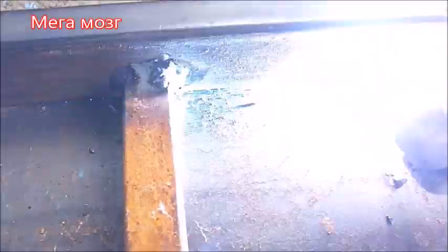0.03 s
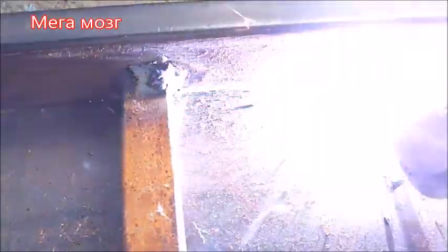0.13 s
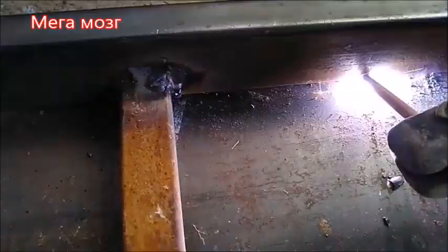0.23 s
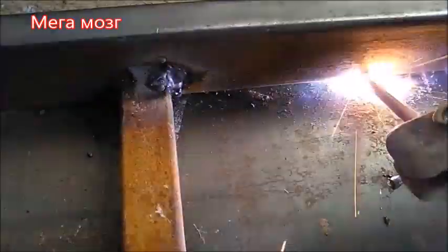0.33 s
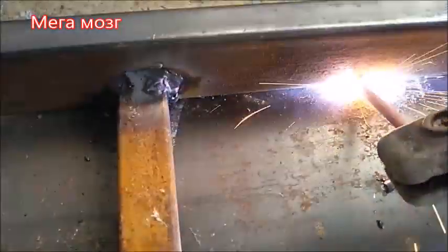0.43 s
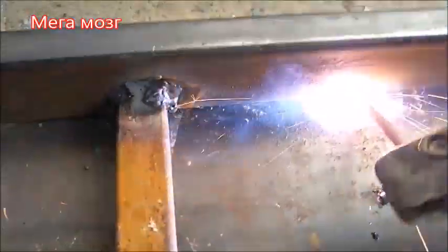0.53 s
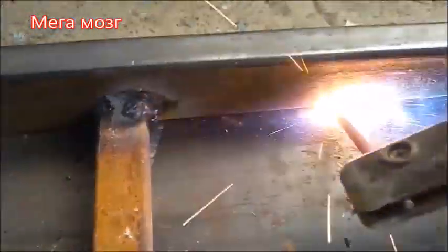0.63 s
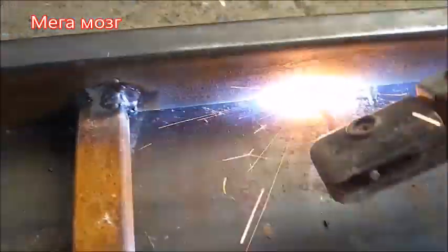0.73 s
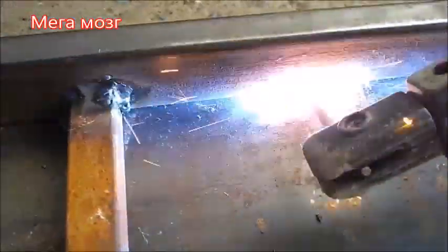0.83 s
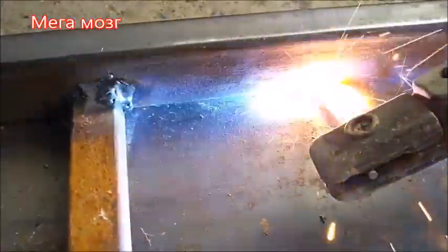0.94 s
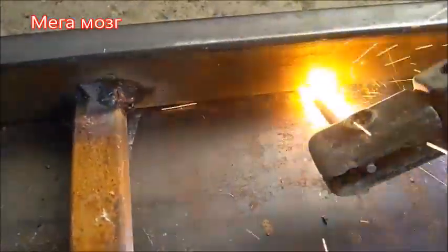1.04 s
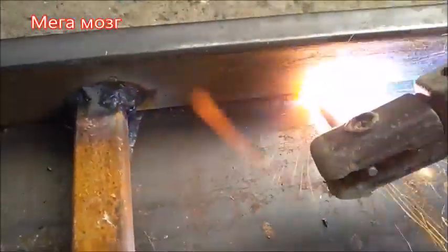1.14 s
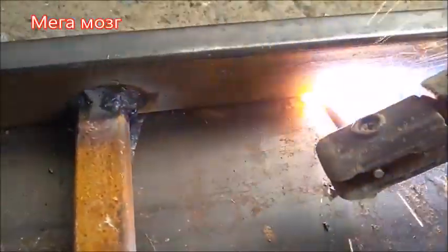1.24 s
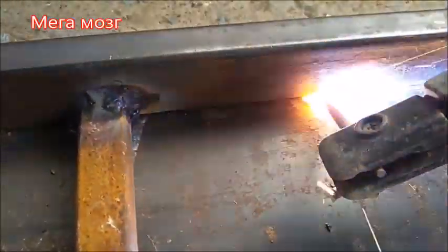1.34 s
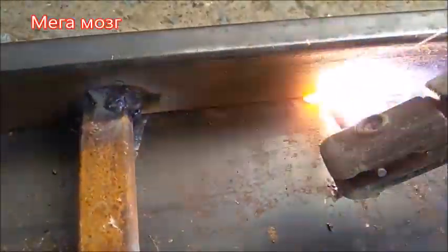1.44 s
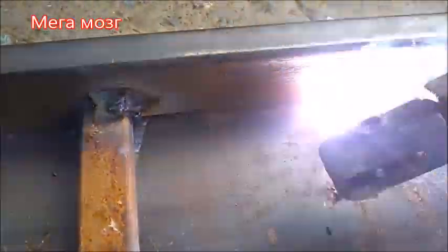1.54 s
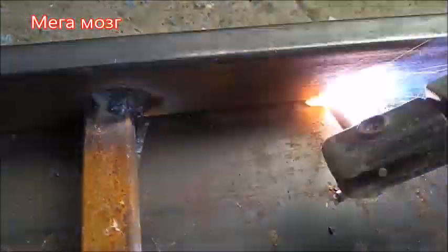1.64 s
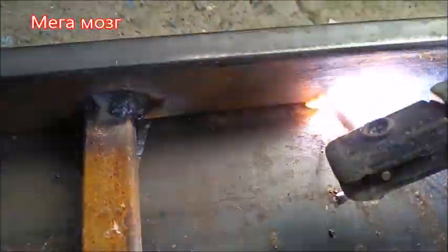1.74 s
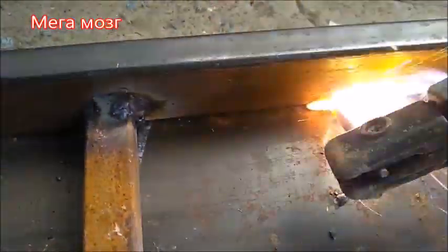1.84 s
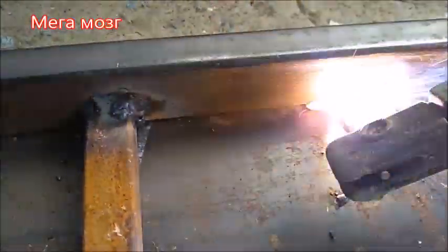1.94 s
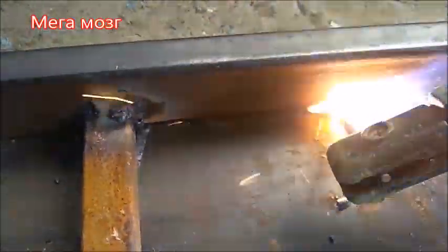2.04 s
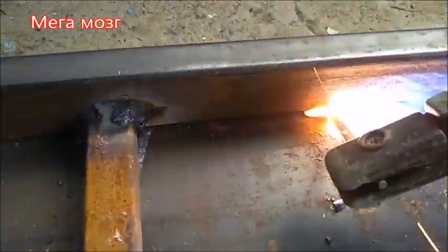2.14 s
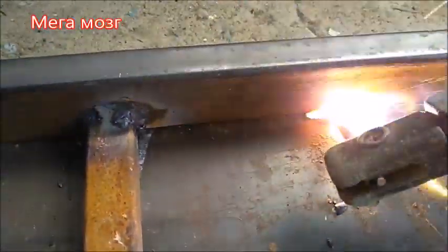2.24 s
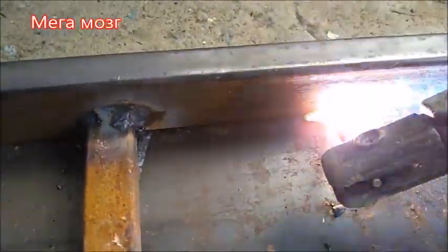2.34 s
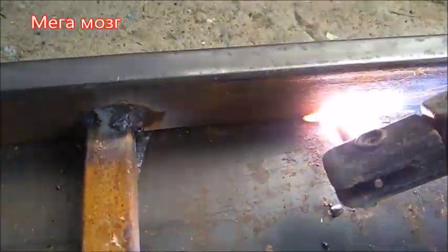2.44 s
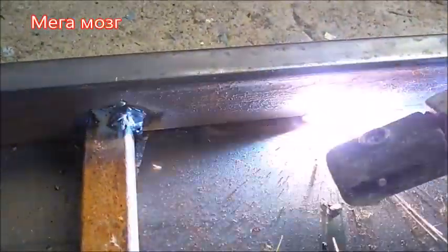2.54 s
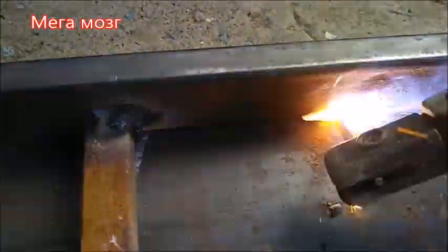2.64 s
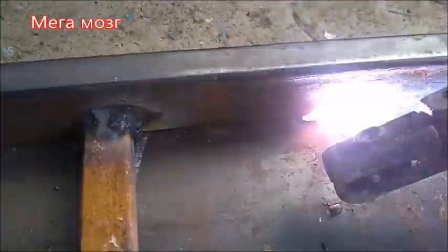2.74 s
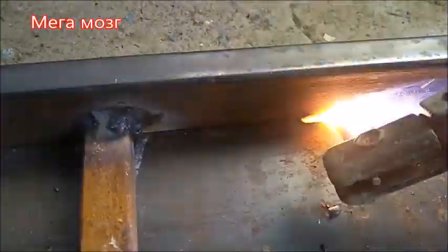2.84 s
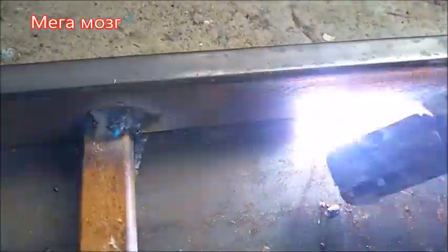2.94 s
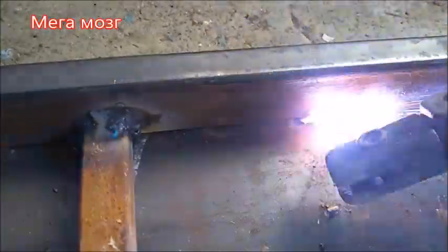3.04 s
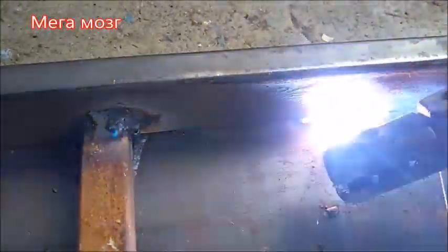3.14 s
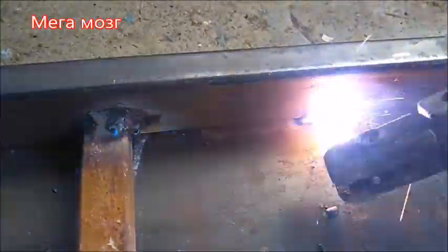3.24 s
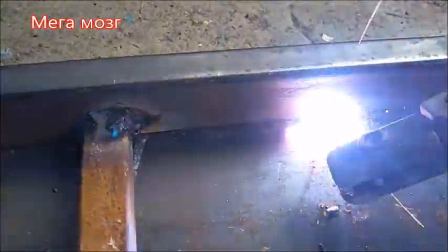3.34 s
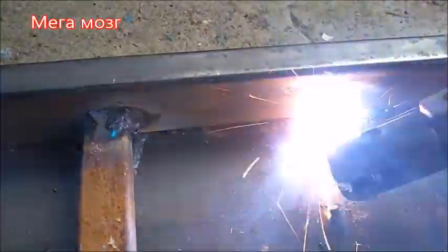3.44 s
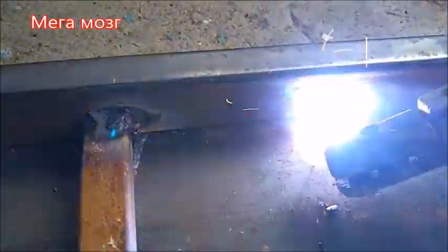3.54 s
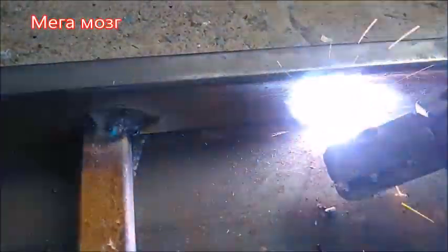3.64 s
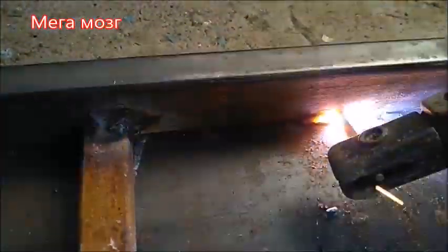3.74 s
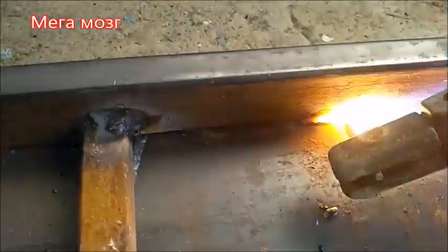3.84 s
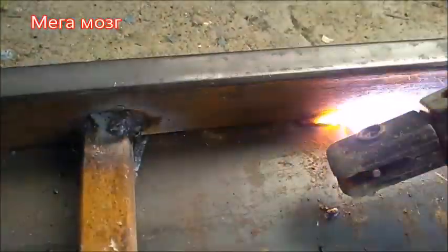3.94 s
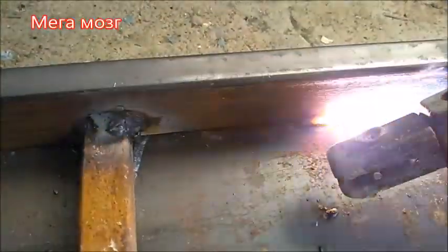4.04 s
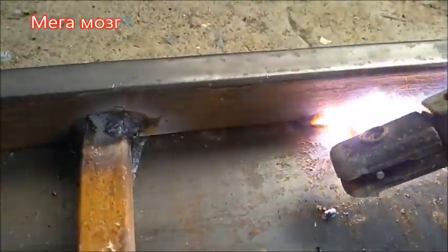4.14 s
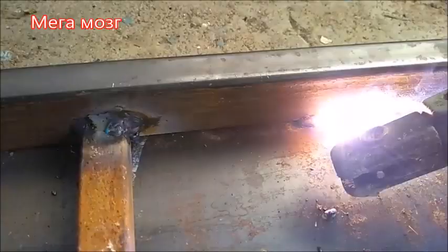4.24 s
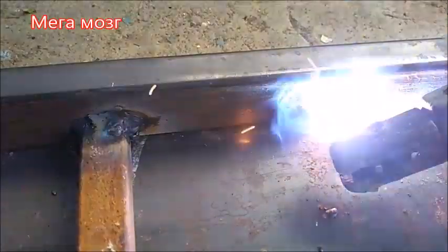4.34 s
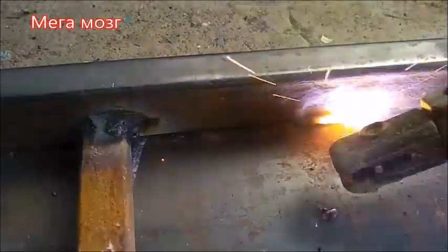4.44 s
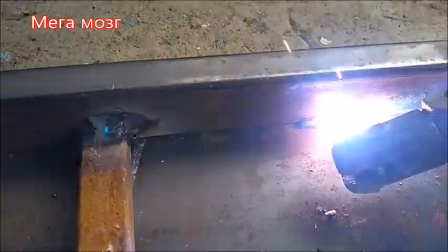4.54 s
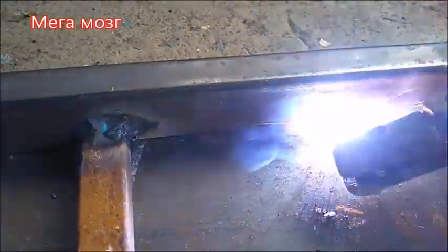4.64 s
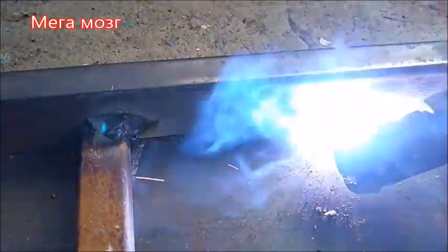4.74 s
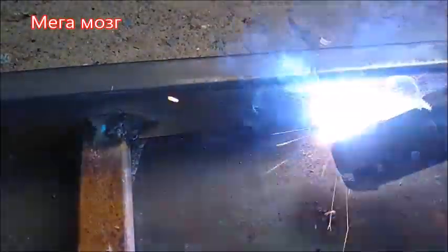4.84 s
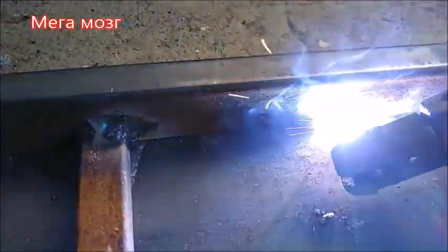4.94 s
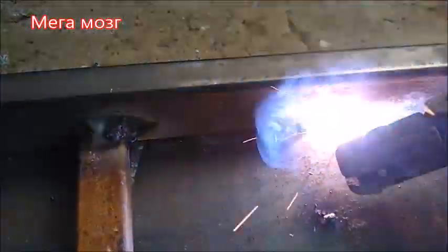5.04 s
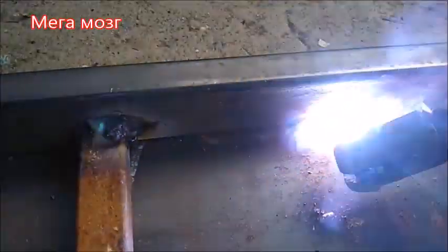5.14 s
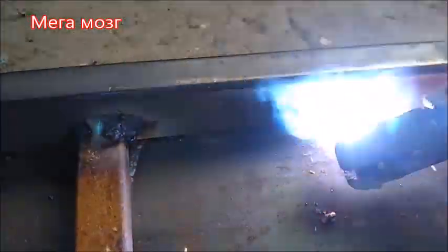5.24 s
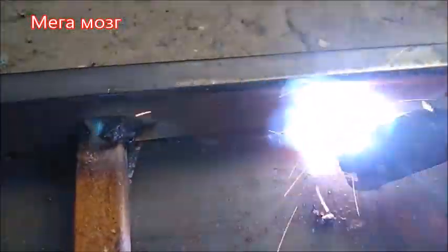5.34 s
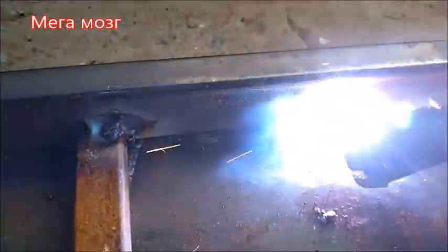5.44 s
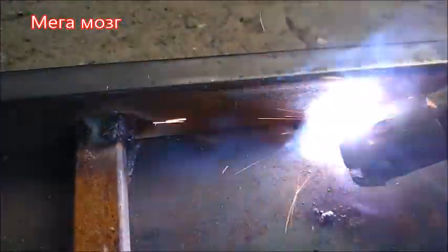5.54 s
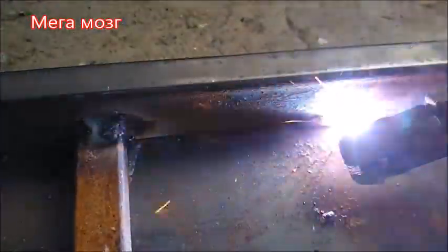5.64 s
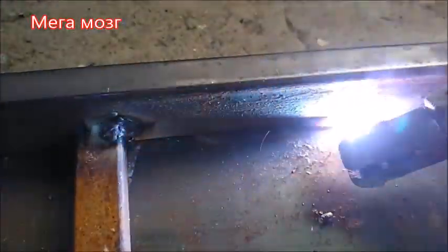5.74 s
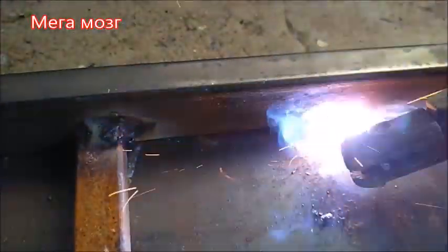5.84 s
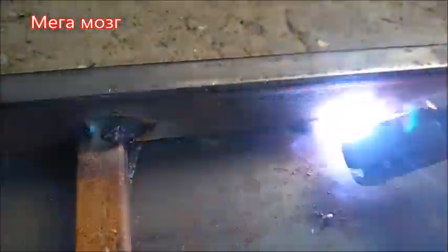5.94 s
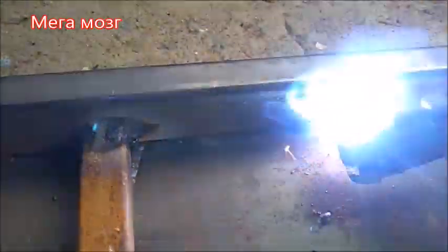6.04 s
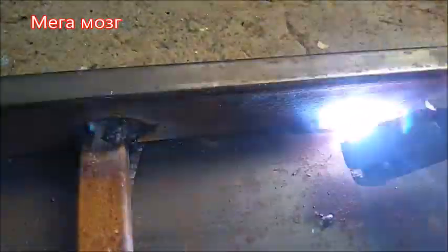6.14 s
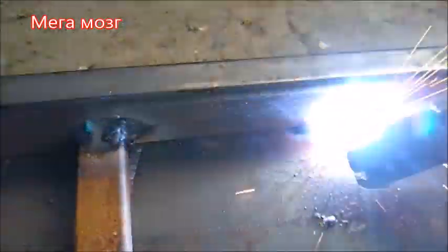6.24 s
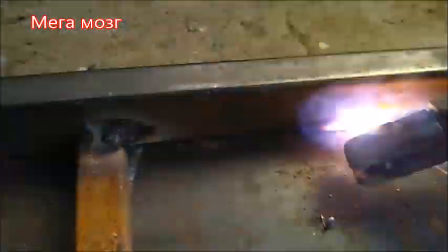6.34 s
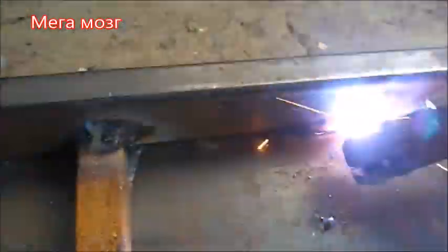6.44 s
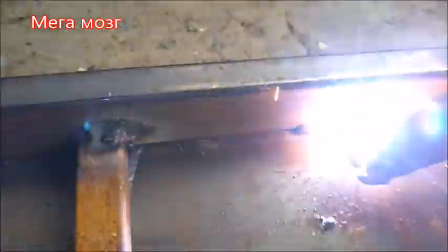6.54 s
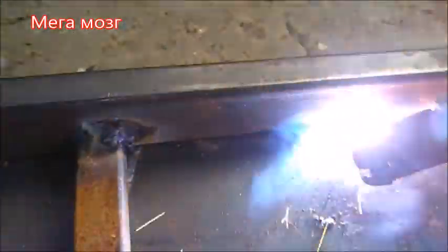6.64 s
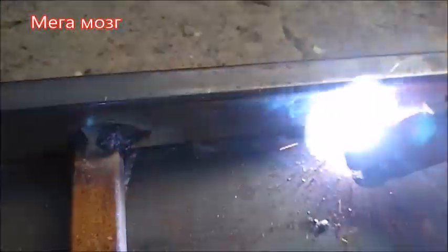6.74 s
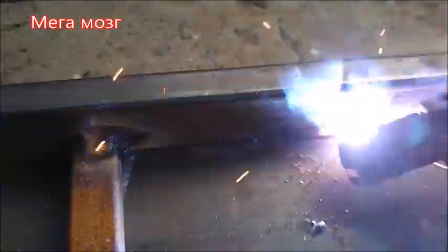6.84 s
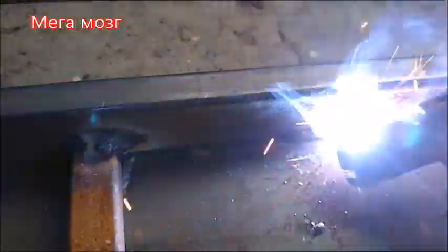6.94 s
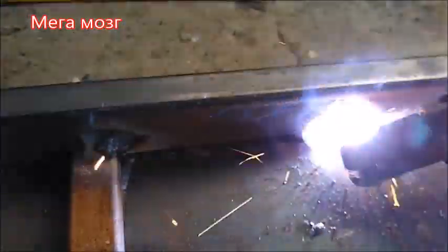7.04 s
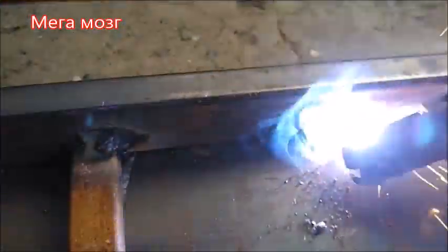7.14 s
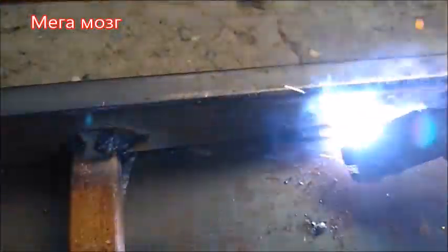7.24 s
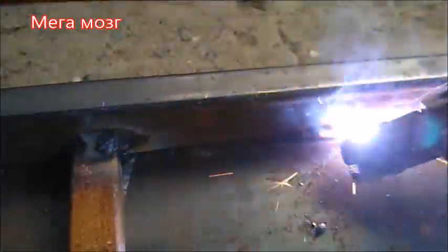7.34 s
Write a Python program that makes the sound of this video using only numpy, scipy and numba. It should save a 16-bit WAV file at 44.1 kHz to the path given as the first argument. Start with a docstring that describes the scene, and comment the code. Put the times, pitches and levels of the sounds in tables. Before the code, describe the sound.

Stick welding heard very near: almost no silence, a faint scratch, then a sudden bright crackling burn. Dense, irregular sputters swell many times a second over continuous hiss, mixed with knocking bursts and bubbly blips. The first two seconds are loudest and centred; later the arc sits to the right, weaker, airy and watery, with occasional strong spits. Dry workshop, compact stereo microphone, slightly hollow, band-limited colour.

```python
"""In the corner of a steel frame, close to a small stereo camera, a rod scrapes: the shop-air noise briefly
rises. A stick-welding arc strikes mid-picture: four ranges of noise burn on and flare about eighteen times a
second. Droplets shorting the gap and bursting gas pockets thud as short swinging tones, and the pool gurgles as
sinking ones. From about two seconds the arc is heard aside: the fainter the hiss, the further right it leans.
All along, dark gaps open and close in the hiss and narrow bands stand out; the gaps deepen once the arc is
aside."""
import sys
import numpy as np
from scipy import signal
from scipy.fft import rfft, irfft
from scipy.io import wavfile
from scipy.ndimage import uniform_filter1d
from numba import njit

SR = 44100
rng = np.random.default_rng(int(sys.argv[2]) if len(sys.argv) > 2 else 0)


def put_to_file(sound):
    """Save the sound as 16-bit audio at rate SR, in the file named by the first command-line argument."""
    columns = np.atleast_2d(sound).T  # one column per channel
    safe = np.clip(columns, -1, 1)
    whole_steps = np.round(safe * 32767)
    wavfile.write(sys.argv[1], SR, whole_steps.astype(np.int16))


N = 326340

# All levels are those ahead of the banded colour and the camera.
STRIKE_S, STRIKE_RISE_S = 0.083, 0.014
ASIDE_S = 1.95  # until then the arc is heard from the middle
POOL_LEAN_DB = -1.5  # left minus right of thuds and gurgles once the arc is aside


def undb(db):
    """Amplitude ratio of a level in dB."""
    return 10 ** (np.asarray(db) / 20)


def colour(x, points):
    """Shapes noise by (f/Hz, level/dB) points and sets its rms to 1."""
    hz, db = np.transpose(points)
    f = np.arange(N // 2 + 1) * SR / N + 1
    shape_db = np.interp(np.log(f), np.log(hz), db, left=-90, right=-90)
    y = irfft(rfft(x) * undb(shape_db), N)
    return y / np.sqrt(np.mean(y ** 2))


def walk(rate):
    """Random levels held 1 / rate s and slewed twice; spread near 1."""
    k = int(SR / rate)
    steps = np.repeat(rng.standard_normal(N // k + 1), k)
    return 1.3 * uniform_filter1d(uniform_filter1d(steps, k), k)[:N]


def sides(pan_db):
    """Left and right gains from left minus right dB."""
    return undb(np.array([pan_db, -pan_db]) / 2)


def pair(points, unlike, grain_db):
    """Grainy noise at two microphones: a shared part and an opposed part."""
    grit = undb(grain_db * rng.exponential(size=N))  # tiny sparks of very uneven size
    mid, side = (colour(grit * rng.standard_normal(N), points) for _ in range(2))
    share = np.clip(unlike, 0, 1) / 2
    return np.sqrt(1 - share) * mid + np.sqrt(share) * side * np.array([[1], [-1]])


SHOP_DB = -60
TOUCH_S, TOUCH_DB = .058, 7  # the rod scrapes the joint from here until the strike; rise of the noise
# Colour of the air in the workshop: f/Hz, relative level/dB per Hz
SHOP_COLOUR = [(60, -40), (150, -8), (500, 0), (900, -6), (1500, -9), (1600, 0), (1700, -10), (2350, -14),
               (2550, 2), (2750, -13), (6000, -17), (16000, -28)]


def shop():
    """Quiet workshop air as steady noise, raised while the rod scrapes."""
    t = np.arange(N) / SR
    scraping = (t > TOUCH_S) * (t < STRIKE_S)
    return undb(SHOP_DB + TOUCH_DB * scraping) * pair(SHOP_COLOUR, 0.058, 0)


GURGLE_SAG, GURGLE_WOBBLE = .3, .5  # share of pitch lost over one length; share it wobbles
GURGLE_ROUGH_DB = 5  # how unevenly a gurgle swings
GURGLE_PAN_DB = 2.5  # furthest spread to either side once the arc is aside
# Bubbles in the molten pool: start t/s, peak level/dB before roughness, f/Hz at the peak, length/ms
GURGLES = [(0.227, -15, 447, 11), (0.267, -24, 420, 12), (0.305, -17, 346, 9.3), (0.343, -24, 462, 11),
           (0.424, -23, 210, 12), (0.513, -22, 259, 13.3), (0.575, -30, 180, 10), (0.654, -41, 404, 7.5),
           (0.78, -29, 316, 7.6), (0.911, -34, 171, 7.8), (0.961, -28, 563, 18), (1.074, -28, 337, 11),
           (1.169, -15.5, 282, 9.6), (1.209, -26.5, 234, 8.2), (1.299, -27.5, 450, 10.6),
           (1.361, -21, 236, 11), (1.401, -19, 302, 9.6), (1.466, -27, 410, 11), (1.643, -35, 590, 9),
           (1.725, -31, 537, 12), (1.819, -10, 412, 11.2), (1.932, -17.5, 224, 8.9),
           (2.071, -23.5, 260, 6.8), (2.122, -29.5, 212, 14), (2.277, -20, 340, 9.6),
           (2.305, -24, 286, 9.1), (2.336, -19, 212, 9.3), (2.388, -29, 564, 13), (2.416, -25, 184, 12),
           (2.448, -29.5, 258, 10.6), (2.479, -29, 172, 21), (2.524, -23, 320, 10), (2.539, -23, 480, 9.5),
           (2.647, -39, 173, 9.5), (2.998, -27, 385, 7), (3.317, -29, 470, 17), (3.376, -35, 380, 15),
           (3.471, -21.5, 215, 10.4), (3.505, -23, 205, 10.5), (3.55, -32, 223, 11), (3.888, -31, 266, 15),
           (3.985, -17, 212, 9.5), (4.053, -25, 243, 15), (4.094, -32, 455, 13), (4.115, -32.5, 536, 12),
           (4.125, -24, 267, 11.3), (4.141, -25, 245, 10), (4.256, -31.5, 397, 15), (4.279, -25, 210, 9.9),
           (4.295, -27, 170, 9.3), (4.616, -28, 556, 10.4), (4.769, -47, 600, 9.5), (4.799, -40, 573, 12),
           (4.855, -29, 278, 9.1), (5.018, -36.5, 323, 13), (5.281, -36, 463, 10),
           (5.534, -27.5, 319, 10.5), (5.705, -35, 333, 9), (5.825, -39, 410, 12), (5.875, -40, 519, 12),
           (6.37, -29, 327, 13), (6.549, -35, 514, 12), (6.583, -34, 225, 11), (6.891, -31, 183, 14),
           (6.993, -36, 500, 10), (7.029, -33, 530, 11), (7.103, -27.5, 560, 7.6), (7.238, -34, 214, 11)]


def gurgles():
    """A bubble in the pool wobbles for a few uneven swings and sinks in pitch."""
    out, wobble, swell = np.zeros((2, N)), walk(400), walk(300)
    for (s, db, hz, ms), (turn, place) in zip(GURGLES, rng.random((len(GURGLES), 2))):
        i = np.arange(int(s * SR), min(int((s + ms / 400) * SR), N))
        x = (i / SR - s) * 2000 / ms  # 1 at the peak, half a length after the start
        pitch = hz * (1 + GURGLE_SAG * (1 - x) / 2 + GURGLE_WOBBLE * wobble[i])
        phase = np.cumsum(pitch) / SR
        level = x * np.exp(.5 - x ** 2 / 2) * undb(db + GURGLE_ROUGH_DB * swell[i])
        tone = level * np.cos(2 * np.pi * (phase + turn))
        pan_db = GURGLE_PAN_DB * (2 * place - 1) * (s > ASIDE_S)
        out[:, i] += tone * sides(pan_db)[:, None]
    return out


PATTER_PER_S = 60
PATTER_DB, PATTER_HZ = 8.5, 650  # middle level above the roar; middle pitch


def patter():
    """Small thuds at random moments, their strength following the roar of the burn."""
    moment, strength, size = rng.random((int(PATTER_PER_S * N / SR), 3)).T
    s = .12 + moment * (N / SR - .16)
    burn_s, roar_db = np.transpose(BURN)[[0, 3]]
    db = np.interp(s, burn_s, roar_db) + PATTER_DB + 8 * (strength - .5)
    return list(zip(s, db, PATTER_HZ * 2 ** (3.34 * (size - .5))))


POCKET_S, POCKET_LAW = 0.0013, 0.14  # time scale of a 1 kHz burst; lower pockets last longer by this power
HEAVE_DB, HEAVE_DB_PER_OCTAVE = -48.5, -16  # heave under a 1 kHz thud; low thuds heave more
# Thuds from the weld pool: t/s, level/dB, f/Hz at the burst
THUDS = [(0.0959, -3, 1210), (0.31, -6.5, 590), (0.3471, -2.5, 876), (0.3592, -2.5, 875), (0.3663, -7, 890),
         (0.3972, -4.5, 1060), (0.4081, -7, 1060), (0.4138, -6, 940), (0.427, -20, 270), (0.5133, -21, 500),
         (0.5186, -9.5, 500), (0.5305, -14, 330), (0.532, -11, 1000), (0.5393, -6, 1050),
         (0.5446, -7.5, 1020), (0.5532, -4.5, 1040), (0.662, -12, 1060), (0.697, -18, 845),
         (0.7759, -15, 600), (0.7315, -19, 850), (0.749, -18, 700), (0.7862, -6, 596), (0.799, -2.5, 900),
         (0.9085, -14, 1190), (0.9154, -5.5, 1170), (0.9524, -19, 1040), (0.9682, -17, 720),
         (1.0015, -14, 1160), (1.037, -18, 965), (1.047, -21, 700), (1.056, -14, 870), (1.073, -11, 900),
         (1.0822, -3.5, 1030), (1.1497, -13, 890), (1.1743, -5.5, 357), (1.205, -21, 700),
         (1.214, -20, 450), (1.233, -8, 900), (1.2401, -7, 810), (1.27, -24, 800), (1.2913, -16, 1200),
         (1.3054, -12, 596), (1.335, -15, 490), (1.3664, -14, 330), (1.378, -16, 700), (1.3871, -11, 1030),
         (1.4033, -13, 700), (1.4229, -2, 870), (1.4325, -5, 990), (1.508, -14.5, 684), (1.5919, -6.5, 875),
         (1.6678, -16, 747), (1.76, -10.5, 980), (1.8185, -6, 380), (1.8266, -8, 700), (1.844, -6.5, 418),
         (1.912, -5.5, 1070), (1.9366, -13, 314), (2.0456, -17, 750), (2.078, -13, 370), (2.084, -16, 251),
         (2.1178, -14.5, 940), (2.1296, -33, 250), (2.269, -17, 700), (2.2836, -9, 423), (2.3141, -7, 340),
         (2.3438, -9, 342), (2.3944, -18, 550), (2.5443, -32, 422), (2.5515, -15, 433), (2.5627, -16, 330),
         (3.0035, -5.5, 735), (3.0172, -11.5, 970), (3.3782, -20, 760), (3.4756, -3.5, 477),
         (3.4889, -3, 915), (3.5114, -13, 600), (3.5228, -13, 650), (3.803, -25, 800), (3.8925, -16, 430),
         (3.9039, -17, 302), (3.932, -19, 500), (3.9817, -9, 1170), (3.989, -17, 237), (4.0344, -15, 520),
         (4.049, -12.5, 600), (4.0584, -7, 600), (4.0844, -15, 277), (4.152, -18, 308), (4.286, -21.5, 500),
         (4.313, -24, 500), (4.43, -24, 497), (4.6247, -15.5, 584), (5.5328, -26, 1150), (5.5347, -13, 430),
         (5.7043, -21, 520), (5.8292, -17.5, 460), (6.3792, -13, 925), (6.3942, -19, 805),
         (6.411, -22, 800), (6.5552, -20, 530), (7.035, -28, 400), (7.1084, -27, 460)]


def thuds(rise=0.56, fall=0.26, glide=0.19, heave_hz=190, heave_s=0.00087):
    """A gas pocket swings a few times, dropping in pitch as it bursts; the pool heaves once, lower, behind it."""
    out = np.zeros(N)
    rows = THUDS + patter()
    t = np.arange(-600, 1200) / SR  # 0 at the burst
    late = np.maximum(t / heave_s + .5, 0)
    for (s, db, hz), (turn, size) in zip(rows, rng.random((len(rows), 2))):
        x = t / POCKET_S * (hz / 1000) ** POCKET_LAW
        shape = np.where(x < 0, np.exp(-(x / rise) ** 2), np.exp(-np.abs(x / fall) ** 0.5))
        pocket = shape * np.cos(2 * np.pi * (t * hz * (1 - glide * np.tanh(x)) + turn))
        swing = np.cos(2 * np.pi * (t * heave_hz * (0.976 + 0.42 * size) + turn))
        heave = late * np.exp(1 - late ** 0.55) * swing
        heave_db = HEAVE_DB + HEAVE_DB_PER_OCTAVE * np.log2(hz / 1000)
        i = int(s * SR) - 600
        out[i:i + len(t)] += undb(db) * (pocket + undb(heave_db) * heave)
    return out


CENTRED_DB, LEAN = -33, 0.57  # sizzle above this is heard in the middle; dB toward the right per dB below it


def lean(db, s):
    """Left minus right dB: once the arc is aside, the fainter the hiss the further right."""
    return LEAN * np.minimum(db - CENTRED_DB, 0) * (s > ASIDE_S)


EVEN_DB, TREBLE_SLOPE = -18.5, 0.59  # a flare this strong is as loud in the treble; weaker ones lose less there
SCATTER_DB = 1  # each flare has its own balance of treble and top
BODY_DB, BODY_MS = -22, 6  # rough roar around each thud: level against the thud, its full width at 1/e power
# Flares of the arc, before the trim of each range: centre t/s, length/ms near half power,
# sizzle level/dB, roar level/dB above the sizzle
FLARES = [(0.102, 16.7, -16.5, -5.5), (0.178, 7.6, -55, -15), (0.308, 12, -21, 5), (0.354, 26.4, -21.5, -1),
          (0.408, 23, -24, -1.5), (0.429, 9, -23, 0), (0.472, 8.1, -26, -6.5), (0.517, 19, -27, 6),
          (0.543, 31, -21, -5), (0.579, 8.8, -16, -9), (0.613, 10, -24, -22), (0.661, 14.6, -19, -8.5),
          (0.697, 9.5, -25, -4.5), (0.734, 27, -27.5, -5), (0.788, 25.4, -22, 4.5), (0.84, 11, -24, -29),
          (0.876, 10, -25, -25), (0.895, 18, -31, -21), (0.913, 22, -20.5, -7), (0.958, 22, -32, 4),
          (0.99, 21, -28, -2), (1.041, 31, -32.5, 3.5), (1.079, 13, -19.5, 0), (1.173, 11, -24.5, 2.5),
          (1.213, 21, -38, -10), (1.238, 10, -17.5, 1), (1.26, 17, -25, -7), (1.307, 15, -27.5, 6),
          (1.379, 8.9, -20.5, -2), (1.405, 8, -21.5, 7), (1.426, 17, -21, 1), (1.546, 15, -29, 2),
          (1.592, 11, -17, -18), (1.671, 28, -28, -5.5), (1.717, 10, -29, -9), (1.757, 17, -22.5, -3),
          (1.777, 13, -28, -25), (1.827, 16, -20.5, 2), (1.911, 14, -20, -2.5), (1.936, 13, -23.5, -0.5),
          (2.029, 34, -31, -3), (2.088, 16, -31.5, -4.5), (2.144, 45, -44, 11), (2.282, 13, -25.5, 4),
          (2.313, 14, -26.5, -5), (2.342, 12, -26, 3), (2.397, 23, -29, -12), (2.445, 13, -30, -18),
          (2.476, 17, -32.5, -3), (2.543, 9.2, -39, -8), (2.621, 7.8, -31, -20), (2.648, 18, -43, 10.5),
          (2.703, 8.3, -42, 5), (2.752, 35, -39.5, 5.5), (2.817, 29, -33, -3), (2.929, 54, -43, 6),
          (2.981, 8.7, -39.5, 8), (3.013, 21.4, -21.5, -3.5), (3.076, 17, -31.5, -29),
          (3.154, 19, -35.5, -1.5), (3.218, 13, -34.5, -5), (3.315, 17, -40, -1), (3.384, 18, -33, -3),
          (3.476, 9.7, -23.5, 6), (3.492, 11, -27, -6), (3.517, 23, -33.5, 4.5), (3.553, 1.2, -25.5, -1),
          (3.598, 2.3, -29.5, 1), (3.632, 9.6, -26, -10), (3.729, 21, -30.5, -8), (3.792, 26, -34, -11),
          (3.827, 28, -36.5, 0), (3.906, 70, -36.5, 2.5), (3.992, 17.5, -19.5, 0), (4.037, 6.8, -27, -4),
          (4.055, 14.4, -17.5, 1), (4.209, 10, -19, -12.5), (4.289, 15, -24, -8), (4.313, 22, -31, -13),
          (4.355, 22, -38.5, -16), (4.413, 43, -39.5, -5), (4.433, 17, -30, -11), (4.505, 13, -38, -23),
          (4.559, 33, -34.5, -5), (4.61, 25, -32.5, -3), (4.637, 15, -39.5, 4), (4.778, 31, -37.5, -0.5),
          (4.859, 6.8, -23.5, -15), (4.939, 32, -30, -16), (4.985, 17, -28.5, -8), (5.029, 15, -34.5, 1),
          (5.067, 10, -36.5, -9), (5.198, 18, -26.5, -18), (5.31, 27, -27.5, -16), (5.381, 14.5, -26, -23),
          (5.489, 14, -30.5, -14), (5.537, 19, -47.5, 11.5), (5.585, 24.5, -29, -11),
          (5.621, 21, -33.5, -14), (5.669, 26, -35.5, -15), (5.704, 19, -29.5, -4.5), (5.727, 34, -32, -31),
          (5.769, 6.5, -36, -26), (5.953, 28, -30, -7), (6.004, 5.8, -27.5, -28), (6.045, 14, -35, -10),
          (6.082, 9.6, -25, -14.5), (6.153, 12, -29, -37), (6.185, 11, -33, -31), (6.211, 26, -33.5, -9),
          (6.301, 21.4, -27, -8.5), (6.394, 43, -36.5, 6.5), (6.444, 19, -41, -5), (6.521, 27, -36.5, 0.5),
          (6.553, 14.4, -26.5, -8), (6.571, 19, -33.5, -3), (6.591, 14, -43.5, 2.5), (6.688, 5.8, -48, -12),
          (6.737, 18, -40, -22), (6.824, 13, -42.5, 5), (6.904, 17, -33.5, -8), (6.958, 8.2, -47, -11),
          (6.994, 22, -40, -12), (7.055, 46, -35.5, -8), (7.11, 15, -18.5, -38), (7.203, 22, -43, -1),
          (7.242, 9.1, -23, -12), (7.255, 14, -32, -16), (7.291, 13, -31.5, -25), (7.302, 19, -31, -30)]


def flare_power(edge=2.48, tail=0.95):
    """Power envelopes (roar, sizzle, treble, top) x (left, right): flares are rounded swells, thuds add roar."""
    out = np.zeros((4, 2, N))
    for (s, ms, db, roar_db), tilt in zip(FLARES, rng.standard_normal(len(FLARES))):
        half = ms * SR / 2000
        i = np.arange(max(int(s * SR - 4 * half), 0), min(int(s * SR + 4 * half), N))
        x = (i - s * SR) / half
        bump = 2 ** -(np.abs(np.where(x > 0, x / tail, x)) ** edge)
        treble_db, tilt_db = TREBLE_SLOPE * (EVEN_DB - db), SCATTER_DB * tilt
        range_db = db + np.array([roar_db, 0, treble_db - tilt_db, treble_db + tilt_db])
        gains = undb(range_db)[:, None] * sides(lean(db, s))
        out[:, :, i] += gains[:, :, None] ** 2 * bump
    for s, db, hz in THUDS:
        i = int(s * SR) + np.arange(-900, 900)
        swell = np.exp(-((i / SR - s) * 2000 / BODY_MS) ** 2)
        out[0][:, i] += undb(2 * (db + BODY_DB)) * swell
    return out


BURN_LEAN_DB, TOP_LEAN_DB = -1, -1.5  # once aside: burn further right than flares; treble ranges further still
UNLIKE_PER_DB, SIZZLE_ALIKE = 0.33, 0.32  # the sides grow unlike as the burn leans; the sizzle by this share of it
TREBLE_UNLIKE, AIR_UNLIKE, LEAST_UNLIKE = 0.69, 0.71, 0.00027  # unlikeness of the two microphones, 0-1
DEPTH_CENTRE, DEPTH_ASIDE, FLARE_FILL = 0.7, 1.2, 0.8  # depth of the gaps (1 = dark); how much a flare fills them
# Steady burn before its wavering: t/s, sizzle 2-6 kHz level/dB, treble 6-10 kHz level/dB,
# roar level/dB, top treble level/dB
BURN = [(0.16, -29.5, -29.5, -39.5, -42), (0.26, -31, -33.5, -35, -36.5), (0.48, -34.5, -35, -41, -31),
        (0.76, -35.5, -35, -45, -32), (1.17, -32, -30.5, -33.5, -35), (1.39, -29.5, -29.5, -33, -32.5),
        (1.89, -34.5, -31.5, -41, -34.5), (2.38, -38.5, -32, -35, -38.5), (3.28, -43.5, -41, -43.5, -40.5),
        (3.65, -37.5, -37, -37.5, -34), (3.91, -46, -35, -47, -38), (4.09, -33.5, -31, -38.5, -35.5),
        (4.35, -45.5, -36.5, -45, -36.5), (4.74, -38, -35, -43.5, -29), (5.38, -40, -38, -50, -29.5),
        (5.82, -38.5, -31.5, -45, -29.5), (6.97, -40, -37.5, -44, -31), (7.4, -41, -39.5, -49.5, -33.5)]
# Colours of the four ranges of arc noise, low to high: f/Hz, relative level/dB per Hz
ROAR = [(70, -39), (150, 8.5), (300, 5.5), (620, 5), (900, 5), (1300, 5), (1800, 3.5), (2900, -15)]
SIZZLE = [(1200, -17.5), (2100, 1.5), (2800, 4), (3500, 6), (4200, 4.5), (5600, 2), (7500, -33)]
TREBLE = [(4600, -12.5), (6100, 6.5), (7500, 6), (9000, 4.5), (10300, 2.5), (13000, -13)]
AIR = [(8800, -28), (11000, -1.5), (13000, 2.5), (15500, 4), (17000, -33)]


def arc():
    """Four ranges of hiss, each a wavering steady burn plus the flares; returns roar, hiss and gap depth."""
    t = np.arange(N) / SR
    s, *columns = np.transpose(BURN)
    sizzle_db, treble_db, roar_db, top_db = (np.interp(t, s, c) for c in columns)
    aside = t > ASIDE_S
    pan_db = lean(sizzle_db, t) + BURN_LEAN_DB * aside
    unlike = -UNLIKE_PER_DB * pan_db
    lit = np.clip((t - STRIKE_S) / STRIKE_RISE_S, 0, 1)
    flutter, flares = 0.68 * walk(35), flare_power()
    out = []
    # colour, burn dB, flare trim dB, own waver dB, grain dB, flare power, unlikeness
    for points, db, flare_db, own_db, grain_db, flare, apart in (
            (ROAR, roar_db, 0.1, 2.1, 2.1, flares[0], None),
            (SIZZLE, sizzle_db, 1.5, 1.3, 1.5, flares[1], None),
            (TREBLE, treble_db, -2.5, 1.6, 1.2, flares[2], TREBLE_UNLIKE),
            (AIR, top_db, -2.5, 1.6, 1.2, flares[3], AIR_UNLIKE)):
        burn = lit * undb(db + flutter) * sides(pan_db)
        calm = burn[0] ** 2 / (burn[0] ** 2 + flare[0] + 1e-12)  # share of the power that is steady burn
        ragged = undb(flare_db + 1.14 * walk(180))  # a flare is a string of sputters
        waver = undb(own_db * (0.21 + 0.49 * calm) * walk(30))
        gain = np.sqrt(burn ** 2 + flare * ragged ** 2) * waver
        if apart:
            gain = gain * sides(TOP_LEAN_DB * aside)
        else:  # the low ranges of flares are alike on both sides
            apart = LEAST_UNLIKE + unlike * calm * (SIZZLE_ALIKE if points is SIZZLE else 1)
        out.append(gain * pair(points, apart, grain_db))
    filled = flares[1, 0] / (flares[1, 0] + undb(2 * sizzle_db))
    depth = np.where(aside, DEPTH_ASIDE, DEPTH_CENTRE) - FLARE_FILL * filled
    return out[0], sum(out[1:]), depth


@njit
def notch(x, g, k, share):
    """State-variable filter that takes out a share of the band around its centre; a negative share lifts it."""
    y, b, l = np.empty(len(x)), 0., 0.
    for i in range(len(x)):
        v = (b + g[i] * (x[i] - l)) / (1 + g[i] * (g[i] + k[i]))  # band around the centre
        b, l, y[i] = 2 * v - b, l + 2 * g[i] * v, x[i] - share[i] * k[i] * v
    return y


LOW_PATCH_DB, HIGH_PATCH_DB = 4, 2  # how far each part of the spectrum flickers on its own
# Centres of the flickering parts of the roar and of the hiss: f/Hz
LOW_PATCHES_HZ = [200, 340, 580, 980, 1650]
HIGH_PATCHES_HZ = [2600, 3900, 5800, 8000, 10800, 14000]


def patches(x, centres, db, rate):
    """Each part of the spectrum swells and sinks on its own, so the sputter comes in uneven patches."""
    even = np.ones(N)
    for hz in centres:
        share = 1 - undb(db * walk(rate) - db ** 2 / 9)  # the last term offsets the power the swells add
        x = np.array([notch(side, even * np.tan(np.pi * hz / SR), even * 0.67, share) for side in x])
    return x


GAP_WIDTH_HZ = 700
GAP_SWING, GAP_SHARE, DARKEST = .45, 1.05, .995  # how far gaps open and close; dark part of width; deepest cut
MOTTLE_DB, MOTTLE_FROM_HZ = 4, 3740  # small patches swell and sink above this pitch, fully an octave up
# Broad gap in the treble that drifts: t/s, f/Hz
GAP = [(0, 9600), (1.0, 11900), (1.8, 11350), (5.5, 11400), (6.6, 10300), (7.4, 10400)]
# Dark gaps in the hiss that open and close: f/Hz, width/Hz, extra depth (1 = dark)
DIPS = [(2080, 150, -.2), (2500, 380, .2), (3100, 330, .1), (3790, 340, .2), (4310, 380, .3),
        (4770, 220, .2), (5200, 340, .3), (5780, 420, .4), (7200, 220, -.4), (7830, 300, -.2),
        (8750, 280, -.3), (9600, 300, -.4), (10650, 300, -.3), (12750, 400, -.4), (14250, 250, -.6)]
# Narrow bands where the hiss stands out: f/Hz, width/Hz, lift level/dB at full depth
RINGS = [(1240, 60, 4), (2150, 65, 8), (2800, 80, 8), (3480, 75, 8), (4020, 70, 9), (4580, 80, 6),
         (4980, 80, 7), (5450, 75, 9), (6160, 80, 6), (7550, 70, 6), (8490, 60, 6), (9085, 60, 7)]


def banded(x, depth, size=2048, hop=512):
    """Flat dark gaps and lifted bands that open, close and shift on their own."""
    f, t, z = signal.stft(x, SR, nperseg=size, noverlap=size - hop)
    f, at = f[:, None], np.minimum((t * SR).astype(int), N - 1)
    depth, gain = uniform_filter1d(depth, size=hop * 2)[at], 1
    gaps = [[np.interp(t, *np.transpose(GAP)) * (1 + .012 * walk(6)[at]), GAP_WIDTH_HZ, 0]]
    gaps += [[hz * (1 + .004 * walk(3)[at]), width, extra] for hz, width, extra in DIPS]
    for hz, width, extra in gaps:
        share = np.clip(depth + extra + GAP_SWING * walk(12)[at], 0, DARKEST)
        gain = gain * (1 - share * np.exp(-(2 * (f - hz) / (GAP_SHARE * width)) ** 8))
    for hz, width, db in RINGS:
        lift_db = db * np.clip(depth, 0, 1) * np.clip(1 + 0.27 * walk(13)[at], 0, 2)
        centre = hz * (1 + .003 * walk(3)[at])
        gain = gain * undb(lift_db / (1 + (2 * (f - centre) / width) ** 2))
    mottle = uniform_filter1d(rng.standard_normal(z.shape[1:]), size=3, axis=1)
    mottle = uniform_filter1d(mottle, size=12, axis=0)
    mottle_db = MOTTLE_DB * mottle / mottle.std() * np.clip(f / MOTTLE_FROM_HZ - 1, 0, 1)
    gain = gain * undb(mottle_db - MOTTLE_DB ** 2 / 9)
    return signal.istft(z * gain, SR, nperseg=size, noverlap=size - hop)[1][:, :N]


def scene():
    """Arc, pool and workshop air, all passed through the same dark gaps and lifted bands."""
    t = np.arange(N) / SR
    roar, hiss, depth = arc()
    roar = patches(roar, LOW_PATCHES_HZ, LOW_PATCH_DB, 30)
    hiss = patches(hiss, HIGH_PATCHES_HZ, HIGH_PATCH_DB, 40)
    pool = (thuds() + gurgles()) * sides(POOL_LEAN_DB * (t > ASIDE_S))
    return banded(pool + roar + hiss + shop(), depth * (t > STRIKE_S))


def record(dry):
    """The camera cuts rumble, rounds the highest peaks and cuts the top."""
    low_cut = signal.butter(3, 140, "high", fs=SR, output="sos")
    top_cut = signal.ellip(10, .2, 80, 15700, fs=SR, output="sos")
    rounded = np.tanh(signal.sosfilt(low_cut, dry) / .9) * .9
    return signal.sosfilt(top_cut, rounded)


dry = scene()
out = record(dry)
put_to_file(out)
```